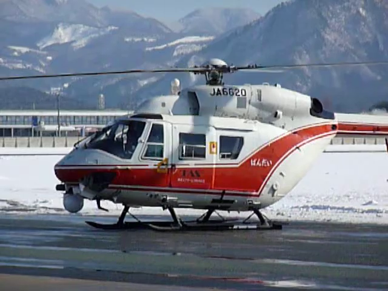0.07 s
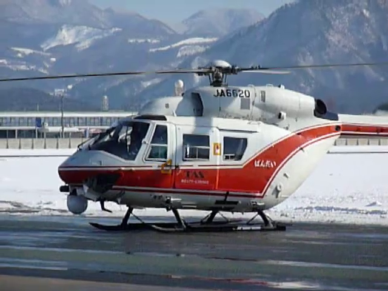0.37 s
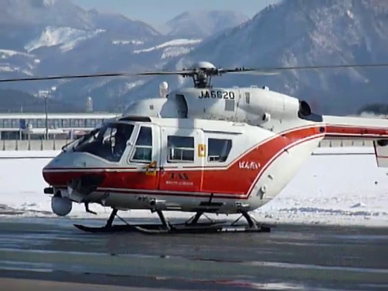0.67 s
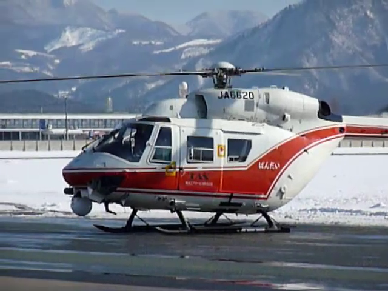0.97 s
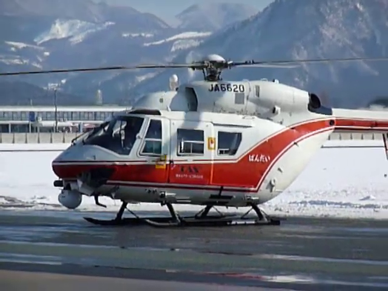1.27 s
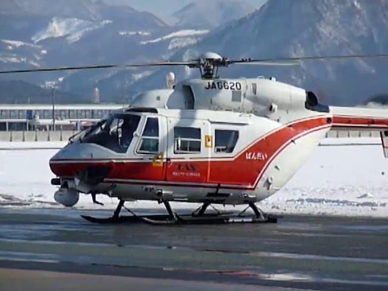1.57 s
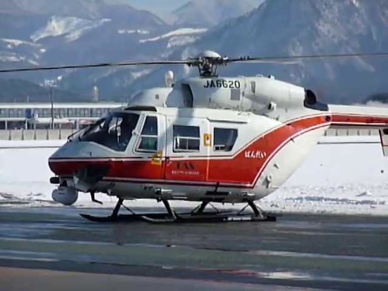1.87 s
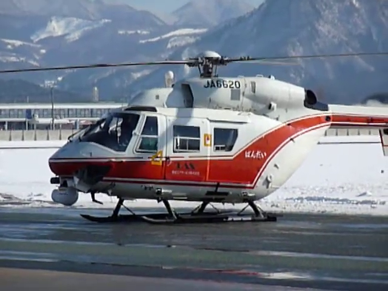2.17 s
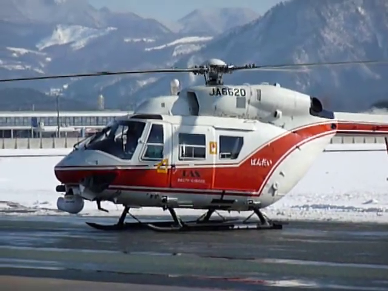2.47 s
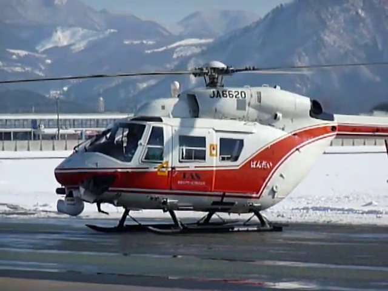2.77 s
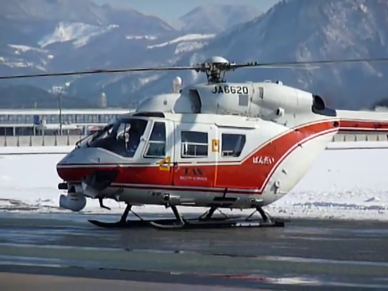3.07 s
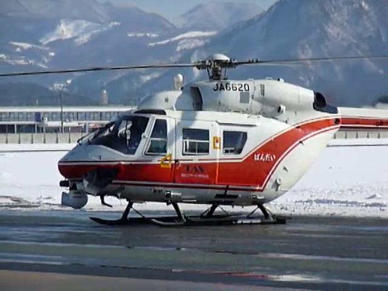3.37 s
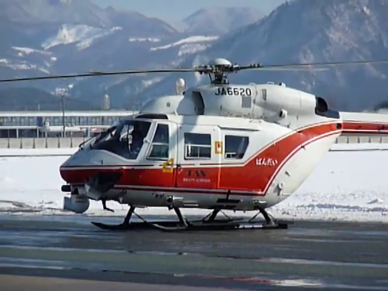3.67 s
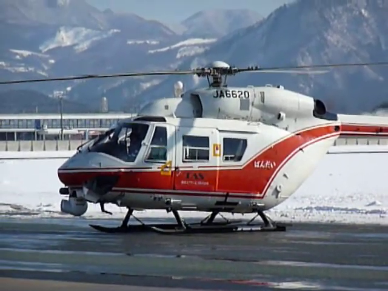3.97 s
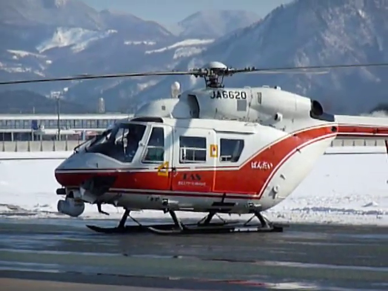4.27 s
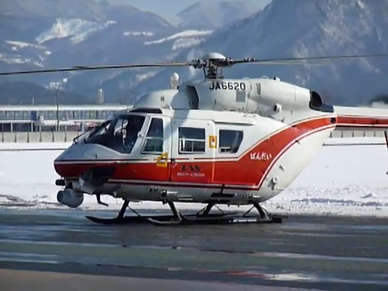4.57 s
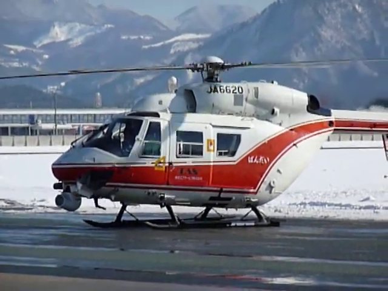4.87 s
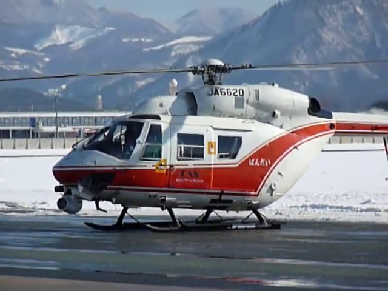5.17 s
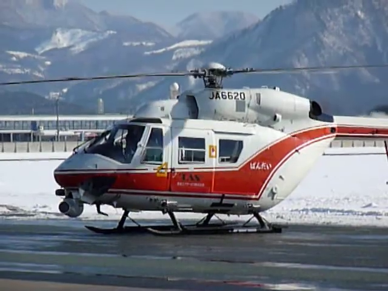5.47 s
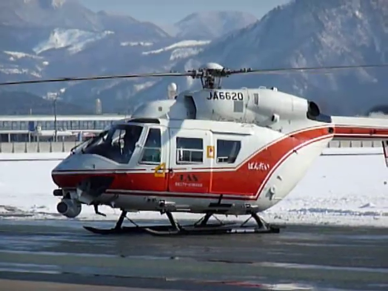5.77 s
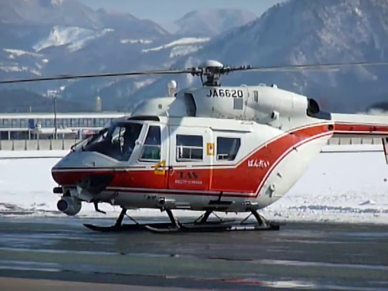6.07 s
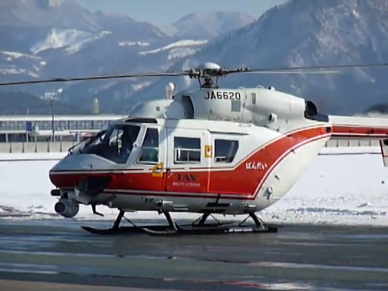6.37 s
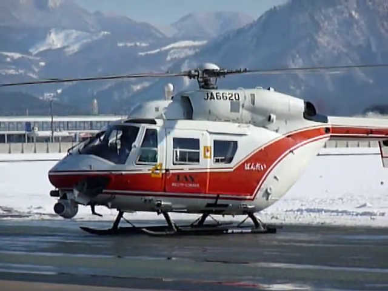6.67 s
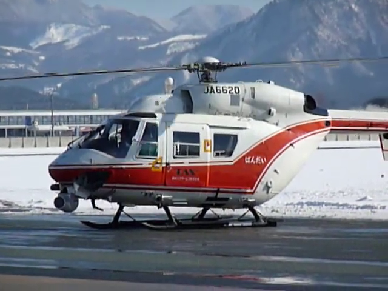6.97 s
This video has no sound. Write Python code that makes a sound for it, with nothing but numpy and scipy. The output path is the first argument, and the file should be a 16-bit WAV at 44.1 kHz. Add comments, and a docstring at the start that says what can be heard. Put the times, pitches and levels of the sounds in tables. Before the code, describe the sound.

A helicopter idles some way off, with a dense steady roar, swishing rotor blades, a low buzz and a thin turbine whine.

```python
"""The sound opens abruptly on a twin-turbine helicopter idling on an open apron, tens of metres away.
From then on the four-blade main rotor churns the air and its blades swish, the tail rotor's pressure
pulses buzz, the exhausts roar, air rushes through the turbines and the gearboxes whine.
Moving air on the path makes each part swell and fade, and the recorder passes only a narrow band.
At 5.4 s comes one faint dry click, and the idling goes on to the end."""
import sys
import numpy as np
from scipy.fft import rfft, irfft, next_fast_len
from scipy.io import wavfile
from scipy.ndimage import map_coordinates

SR = 44100
rng = np.random.default_rng(int(sys.argv[2]) if len(sys.argv) > 2 else 0)


def put_to_file(sound):
    """Save the sound as 16-bit audio at rate SR, in the file named by the first command-line argument."""
    columns = np.atleast_2d(sound).T  # one column per channel
    safe = np.clip(columns, -1, 1)
    whole_steps = np.round(safe * 32767)
    wavfile.write(sys.argv[1], SR, whole_steps.astype(np.int16))


N = 310023
MAIN_HZ, TAIL_HZ = 16.64, 47.04  # blade-passing frequencies
SWISH_LAG_S, ROAR_LAG_S, WASH_LAG_S = 0.0035, 0.0076, 0.018  # delays after a main blade passes


def amp(db):
    """Amplitude ratio of a level in dB."""
    return 10 ** (np.asarray(db) / 20)


def unit(x):
    """Normalisation to rms 1."""
    return x / np.sqrt(np.mean(x ** 2) + 1e-20)


def along(points, hz):
    """Interpolation of (f/Hz, value) points on a logarithmic frequency axis."""
    f, values = np.transpose(points)
    return np.interp(np.log(hz + 1), np.log(f + 1), values)


def curve(points):
    """Linear interpolation of (t/s, value) points at every sample."""
    t, values = np.transpose(points)
    return np.interp(np.arange(N) / SR, t, values)


def wobble(rate):
    """Smooth random fluctuation: a spline through rate Gaussian knots a second."""
    knots = rng.standard_normal(int(N * rate / SR) + 4)
    return map_coordinates(knots, [np.arange(N) * rate / SR])


def filtered(x, response):
    """Linear filtering: the spectrum of x is multiplied by a frequency response."""
    size = next_fast_len(N + SR // 2)
    return irfft(rfft(x, size) * response(np.fft.rfftfreq(size, 1 / SR)), size)[:N]


def turbulence(spectrum, envelope):
    """Flow noise of rms 1: white noise, amplitude-modulated and then shaped by a spectrum."""
    return unit(filtered(envelope * rng.standard_normal(N), lambda hz: amp(along(spectrum, hz))))


def passes(cycles, sharpness):
    """Periodic modulation of zero mean, with one swell for each passing blade."""
    swell = np.exp(sharpness * (np.cos(2 * np.pi * cycles) - 1))
    return swell - swell.mean()


def tones(clock, partials, fade_db, fade_rate):
    """Superposition of sinusoids (f/Hz, rms level/dB), each fading by itself in the moving air."""
    out = np.zeros(N)
    for hz, db in partials:
        phase = 2 * np.pi * (hz * clock + rng.random())
        out += amp(db) * unit(amp(fade_db * wobble(fade_rate)) * np.sin(phase))
    return out


def drive_train():
    """Common time of the geared shafts: the integral of a governed speed that strays very slightly."""
    return np.cumsum(1 + .0002 * wobble(1.2)) / SR


# steadier tones of gear meshes and shafts: f/Hz, rms level/dB
GEAR_TONES = [(486.5, -43), (1364, -58.5), (1589.4, -57), (1596.1, -57), (2090, -53.5), (2472.5, -56)]
# prominent whines: f/Hz, envelope of (t/s, rms level/dB)
WHINE_TONES = [ (675.6, [(0.1, -42), (0.3, -34.5), (0.65, -40), (1.4, -41.5), (2.0, -39), (2.5, -41),
               (3.35, -43.5), (4.0, -38), (4.45, -42.5), (6.7, -41.5)]), (909.4, [(0.25, -41.5),
               (0.7, -50.5), (1.3, -40.5), (1.65, -46), (2.5, -49.5), (2.85, -42.5), (3.6, -49.5),
               (4.3, -43), (4.9, -47), (6.8, -42.5)]), (1045, [(0.2, -38.5), (0.7, -44.5), (1.0, -41),
               (1.25, -49.5), (1.8, -47.5), (2.55, -44), (3.05, -41.5), (3.7, -43.5), (4.3, -42.5),
               (5.1, -42), (5.95, -39.5), (6.25, -45)]), (1236.2, [(0.25, -42), (0.9, -48.5), (2.3, -44),
               (3.1, -45.5), (4.0, -50), (4.4, -54.5), (5.2, -51), (6.2, -46.5), (7.0, -52)]),
               (3135, [(0.2, -51), (1.4, -58), (2.1, -54.5), (3.0, -51), (3.95, -49), (4.5, -54.5),
               (5.8, -51), (6.2, -56), (6.45, -50)]), ]


def whine(clock):
    """Periodic forcing in gearboxes and turbines radiates tones; the prominent ones fade and return."""
    prominent = sum(amp(curve(level)) * tones(clock, [(hz, 0)], fade_db=0.6, fade_rate=9)
                    for hz, level in WHINE_TONES)
    return prominent + tones(clock, GEAR_TONES, fade_db=1.5, fade_rate=7)


# spectral density of the bright hiss: f/Hz, relative level/dB
HISS_SPECTRUM = [(1500, -17), (2100, -13), (2400, -0.5), (2750, 2), (3050, -0.5), (3400, 0.5), (4600, -7)]
# swells of the hiss: t/s, relative level/dB
HISS_SWELLS = [(0.1, -35.5), (0.29, -38.0), (0.38, -35), (0.49, -40), (0.67, -39), (1.27, -38), (1.33, -37),
               (1.57, -38), (1.84, -41.5), (2.04, -36.5), (2.19, -40.5), (2.29, -36.5), (2.46, -39.5),
               (2.54, -37.5), (2.67, -39.5), (2.79, -39.5), (3.02, -36.5), (3.15, -38), (3.35, -35.5),
               (3.54, -39.5), (3.71, -38.0), (4.13, -41), (4.26, -38.0), (4.58, -40), (4.67, -37.5),
               (5.0, -38.5), (5.05, -39.0), (5.29, -37), (5.51, -41), (5.63, -39.5), (5.96, -39.5),
               (6.17, -41.5), (6.34, -38.5), (6.64, -41), (6.76, -38.5), (7.01, -41.5)]
# swish of each main blade in turn: modulation depth, 0-1
SWISH_DEPTHS = [0.2, 0.06, 0.42, 0.25]


def hiss(clock):
    """Amplitude modulation by four unequal blades makes the hiss swish, with a lilt once a revolution."""
    cycles = MAIN_HZ * (clock - SWISH_LAG_S)
    blade = np.round(cycles).astype(int) % len(SWISH_DEPTHS)
    swish = passes(cycles, sharpness=1.8)
    chop = 1 + np.array(SWISH_DEPTHS)[blade] * (swish - swish.min())
    flutter = amp(0.28 * wobble(26))
    return amp(curve(HISS_SWELLS) + 4) * turbulence(HISS_SPECTRUM, chop * flutter)


# spectral density of the turbine air flow: f/Hz, relative level/dB
RUSH_SPECTRUM = [(200, -28), (700, 1), (1100, 4.5), (1500, 1.5), (1900, -1.5), (2130, 0), (2400, -4.5),
                 (2800, -7), (4000, -31)]
# swells of that flow: t/s, relative level/dB
RUSH_SWELLS = [(0.1, -31.0), (0.21, -31), (0.34, -32.5), (0.81, -33), (1.29, -32.5), (1.35, -31.5),
               (1.46, -32), (1.65, -32), (1.83, -36.5), (2.04, -30.5), (2.15, -35.5), (2.33, -31.5),
               (2.46, -34.5), (2.6, -34.5), (2.75, -31.5), (3.08, -33), (3.21, -34.5), (3.29, -31),
               (3.4, -30.5), (3.5, -34.5), (3.81, -32.0), (3.92, -33), (4.0, -35), (4.25, -30.5),
               (4.37, -33.5), (4.83, -30.5), (5.01, -31.5), (5.25, -33), (5.64, -33.5), (5.96, -32),
               (6.04, -34), (6.34, -34), (6.47, -31.5), (6.61, -33.0), (6.83, -32), (7.01, -35.5)]


def turbine_rush(clock):
    """Turbulent flow through the turbines gives broadband noise, modulated by wash and tail blades."""
    wash_pulse = passes(MAIN_HZ * (clock - WASH_LAG_S), sharpness=1.5)
    chop = 1 + 0.16 * wash_pulse + 0.11 * passes(TAIL_HZ * clock, sharpness=4)
    flutter = amp(0.32 * wobble(26))
    return amp(curve(RUSH_SWELLS) - 1.66) * turbulence(RUSH_SPECTRUM, chop * flutter)


# harmonics of the tail rotor's thrust pulses: harmonic number, relative level/dB
TAIL_HARMONICS = [(1, -28.5), (2, -21), (3, -8.5), (4, -6), (5, -13), (6, -13.5)]
# swells of their buzz: t/s, relative level/dB
BUZZ_SWELLS = [(0.1, -25.5), (0.35, -27), (0.8, -31.0), (1.1, -26.5), (1.3, -31.5), (1.92, -31),
               (2.06, -26), (2.21, -33.5), (2.35, -27), (2.48, -36), (2.73, -24.5), (2.85, -35.5),
               (3.12, -27), (3.23, -30.5), (3.63, -28), (3.81, -28.5), (3.96, -25), (4.18, -35.5),
               (4.54, -32), (4.96, -32.5), (5.42, -28), (5.55, -37.5), (5.82, -26), (6.13, -32.5),
               (6.47, -25.5), (6.68, -25), (6.87, -27.5), (7.01, -27.5)]


def tail_rotor(clock):
    """One push for each blade forms a harmonic series, a buzz whose partials stay loosely in phase."""
    lag_s = 0.0012  # from blade passage to push
    jitter_s = 0.00022 * wobble(7)  # the main rotor's wake makes pulses early or late
    cycles = TAIL_HZ * (clock - lag_s + jitter_s)
    buzz = np.zeros(N)
    for harmonic, db in TAIL_HARMONICS:
        phase = 2 * np.pi * harmonic * cycles + 0.5 * wobble(1.5)
        fade_db = wobble(4.4)
        buzz += amp(db + fade_db) * np.sqrt(2) * np.sin(phase)
    flutter_db = wobble(22)
    return amp(curve(BUZZ_SWELLS) + flutter_db) * buzz


# harmonics of the main rotor's pulses: harmonic number, rms level/dB
MAIN_HARMONICS = [(3, -57.5), (4, -58), (5, -59), (6, -48.5), (9, -45.5), (10, -50), (16, -49), (21, -45)]


def main_rotor(clock):
    """Periodic pressure pulses radiate at multiples of the blade-passing frequency."""
    partials = [(harmonic * MAIN_HZ, db) for harmonic, db in MAIN_HARMONICS]
    return tones(clock, partials, fade_db=2.0, fade_rate=2.3)


# spectral density of the rotor wash: f/Hz, relative level/dB
WASH_SPECTRUM = [(150, -28), (300, -7), (420, 0.5), (560, 2.5), (680, -0.5), (870, -10), (1300, -22),
                 (2500, -29)]
# swells of the wash: t/s, relative level/dB
WASH_SWELLS = [(0.1, -23.5), (0.27, -27.5), (0.41, -23.5), (0.61, -26.5), (0.85, -28.5), (0.939, -25),
               (1.09, -28.0), (1.39, -26), (1.45, -29.5), (1.54, -23.5), (1.72, -29.5), (1.84, -28.5),
               (1.99, -25.5), (2.37, -27), (2.48, -30.5), (2.81, -27), (2.88, -32), (3.04, -25.5),
               (3.21, -31), (3.33, -26.5), (3.4, -26.5), (3.48, -31), (3.67, -27.5), (3.83, -26),
               (3.98, -29), (4.18, -25.5), (4.38, -28), (4.47, -24.5), (4.59, -27.0), (4.82, -23.5),
               (5.01, -27.5), (5.2, -24.5), (5.26, -28), (5.38, -26), (5.79, -27), (5.87, -28), (6.18, -28),
               (6.37, -27.5), (6.46, -27.0), (6.55, -28), (6.66, -28.5), (6.72, -23.5), (6.83, -28),
               (7.01, -28.5)]


def rotor_wash(clock):
    """Turbulence churned up by the main rotor radiates noise that pulses gently with the blades."""
    chop = 1 + 0.13 * passes(MAIN_HZ * (clock - WASH_LAG_S), sharpness=1.7)
    flutter = amp(0.72 * wobble(32))
    return amp(curve(WASH_SWELLS) - 1.32) * turbulence(WASH_SPECTRUM, chop * flutter)


# spectral density of the exhaust roar: f/Hz, relative level/dB
ROAR_SPECTRUM = [(20, -37.5), (42, -35), (60, -25.5), (85, -15), (120, -10.5), (165, -5), (225, -1.4),
                 (300, -3.5), (420, -10.5), (600, -24.5), (1200, -52)]
# swells of the roar: t/s, relative level/dB
ROAR_SWELLS = [(0.1, -26), (0.6, -27.5), (0.71, -26.5), (1.26, -29.5), (1.41, -26), (1.56, -31),
               (1.65, -27), (1.85, -31.0), (2.19, -28), (2.46, -29.5), (2.56, -29), (2.67, -30),
               (3.08, -26.5), (3.19, -30.5), (3.4, -27), (3.56, -29.5), (3.711, -28), (3.92, -28),
               (4.07, -30.5), (4.25, -27.5), (4.38, -29.5), (4.55, -27.5), (4.68, -30.5), (4.78, -27.5),
               (4.96, -27.5), (5.54, -28), (5.78, -25), (5.89, -29), (6.0, -26.5), (6.25, -30.0),
               (6.36, -27.5), (6.58, -29.5), (6.84, -26.5), (7.01, -28)]


def exhaust_roar(clock):
    """Turbulent exhaust flow radiates low noise, amplitude-modulated by the blades of both rotors."""
    main_pulse = passes(MAIN_HZ * (clock - ROAR_LAG_S), sharpness=2.3)
    chop = 1 + 0.21 * main_pulse + 0.06 * passes(TAIL_HZ * clock, sharpness=1.7)
    flutter = amp(0.35 * wobble(30))
    return amp(curve(ROAR_SWELLS) + 1.68) * turbulence(ROAR_SPECTRUM, chop * flutter)


def scene():
    """Superposition of sources on one drive train; eddies on the path modulate all air noise alike."""
    clock = drive_train()
    air = exhaust_roar(clock) + rotor_wash(clock) + turbine_rush(clock) + hiss(clock)
    eddies = amp(0.5 * wobble(28))
    return (eddies * air + tail_rotor(clock) + main_rotor(clock) + whine(clock))[None]


# the recorder's one faint click: t/s, peak level/dB before the final low-pass
CLICK_PEAKS = [(5.4235, -25.5)]


def click():
    """A transient: a sudden step relaxes exponentially with a time constant of 1 ms."""
    out, t = np.zeros(N), np.arange(SR // 20) / SR
    for onset_s, db in CLICK_PEAKS:
        out[round(onset_s * SR):][:len(t)] += amp(db) * np.exp(-t / .001)
    return out


# the recorder's treble roll-off: f/Hz, gain/dB
TREBLE_RESPONSE = [(3400, 0.5), (3550, -3.5), (3850, -8), (4150, -15), (4350, -23.5), (4600, -44)]


def record(dry):
    """Saturation rounds the peaks and filtering narrows the band; the sound opens abruptly, clicks once."""
    ceiling, band_hz, start_s, top_hz = 0.29, 4716, 0.072, 15850
    rounded = dry[0] / (1 + np.abs(dry[0] / ceiling) ** 6) ** (1 / 6)
    narrow = filtered(rounded, lambda hz: amp(along(TREBLE_RESPONSE, hz)) * (hz < band_hz))
    opened = narrow * (np.arange(N) / SR >= start_s)
    return filtered(opened + click(), lambda hz: 1 / np.sqrt(1 + (hz / top_hz) ** 300))[None]


dry = scene()
out = record(dry)
put_to_file(out)
```